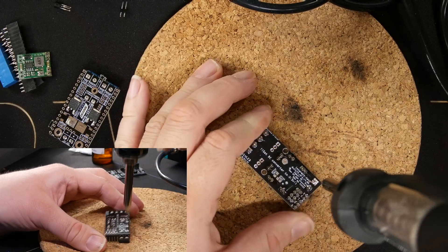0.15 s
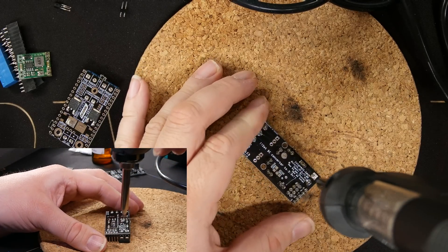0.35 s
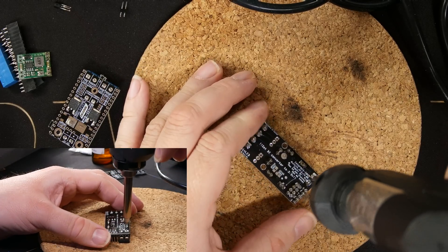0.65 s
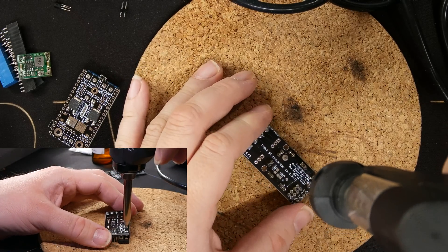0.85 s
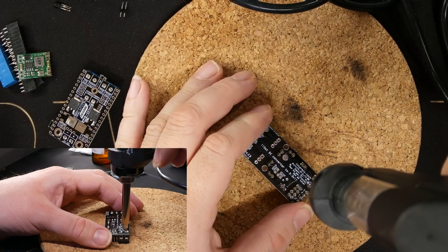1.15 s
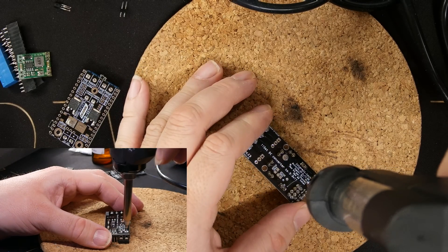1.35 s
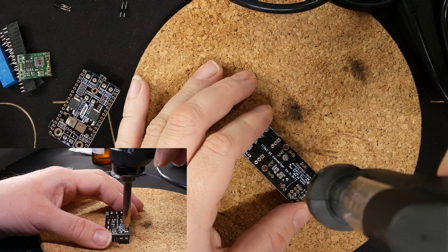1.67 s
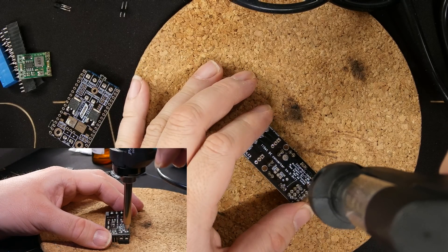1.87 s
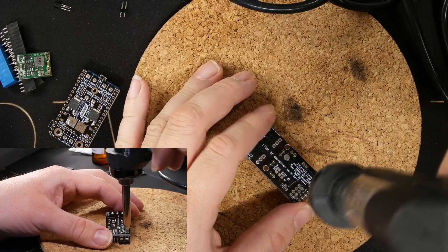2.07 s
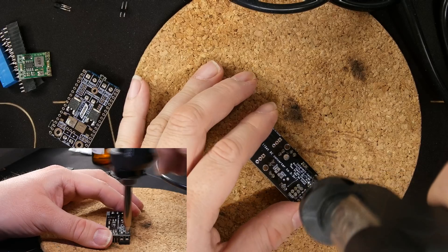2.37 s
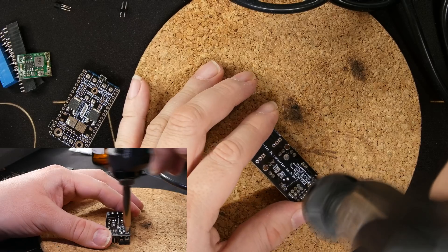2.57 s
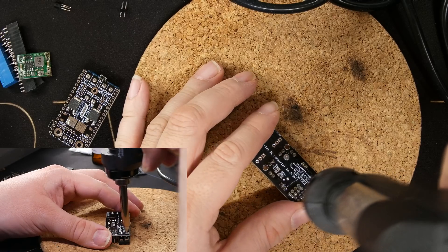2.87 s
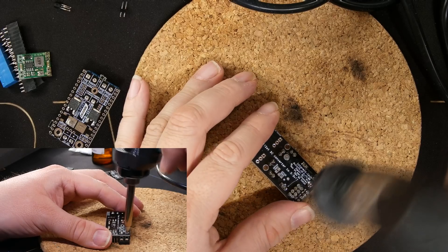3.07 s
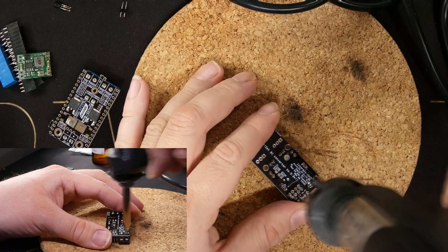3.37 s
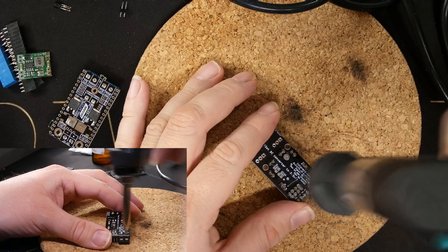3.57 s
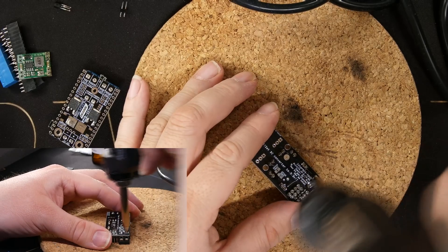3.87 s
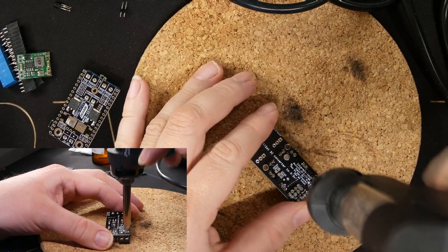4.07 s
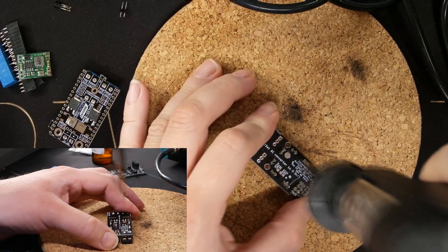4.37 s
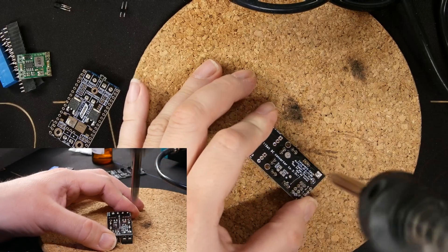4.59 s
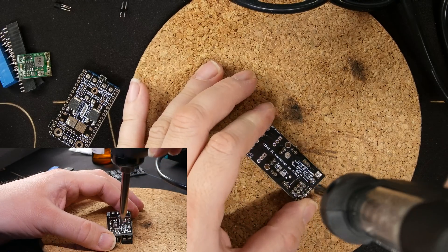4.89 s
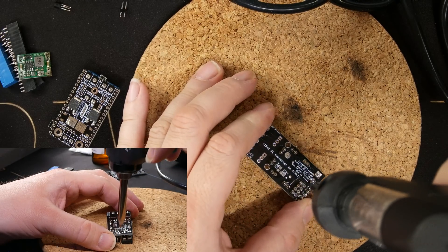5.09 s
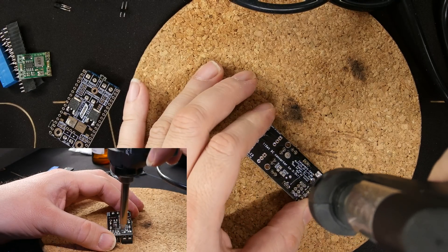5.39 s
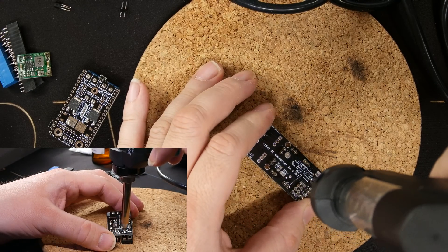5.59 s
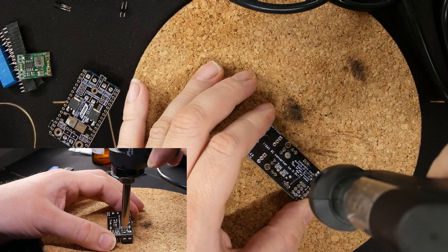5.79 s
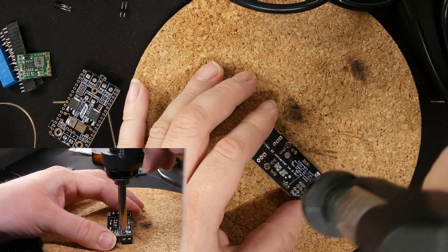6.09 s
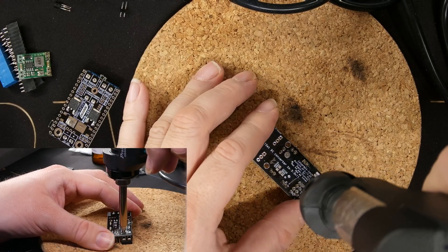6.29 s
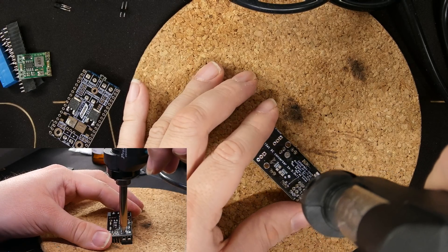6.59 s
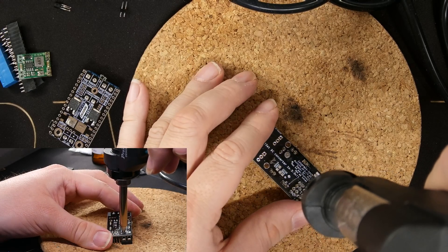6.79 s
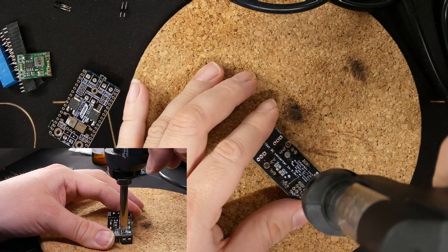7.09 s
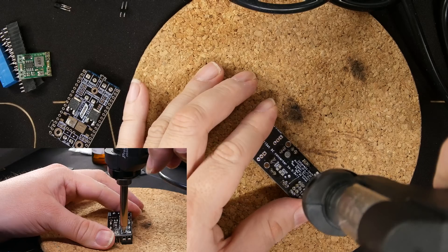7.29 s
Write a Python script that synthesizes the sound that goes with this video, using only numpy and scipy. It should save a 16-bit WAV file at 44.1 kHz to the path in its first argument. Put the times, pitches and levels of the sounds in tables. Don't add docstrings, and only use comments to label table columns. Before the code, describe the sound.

Very close on a workbench in a small quiet workshop: the end of an air rush, faint metal tip taps and thin electronic whine. Trigger clicks, then a small vacuum pump spins up into a rough low buzz for just over a second, its hiss choked by solder. It clunks to a stop, air rushes back with tiny squeaks, light taps and whine follow, and the pump starts again.

```python
import sys
import numpy as np
from scipy import signal
from scipy.fft import rfft, irfft, next_fast_len
from scipy.io import wavfile
from scipy.ndimage import uniform_filter1d

SR = 44100
rng = np.random.default_rng(int(sys.argv[2]) if len(sys.argv) > 2 else 0)


def gain_from_decibels(decibels):
    exponent = np.asarray(decibels, float) / 20
    return 10 ** exponent


def wav_record(signal):
    frames = np.transpose(np.atleast_2d(signal))
    bounded = np.clip(frames, -1, 1)
    quanta = np.round(bounded * 32767).astype(np.int16)
    wavfile.write(sys.argv[1], SR, quanta)


N = 328545
T = np.arange(N) / SR

# (time [s], one for each run)
STARTS_S = (2.665, 6.91)
STOP_S = 4.005
FULL_HZ = 107.5
# (time since start [s], speed [Hz])
SPIN_UP = [(0.0, 37.74), (0.03, 49.9), (0.062, 62.03), (0.125, 78), (0.178, 85.5), (0.24, 89.43),
           (0.33, 94), (0.368, 96.9), (0.459, 101.6)]
# (time [s], speed [Hz])
RUN_SPEED = [
    [(3.15, 103.2), (3.21, 103.9), (3.294, 104.3), (3.496, 107.3), (3.582, 107.2), (3.794, 105.7),
     (3.944, 107.2), (3.995, 107.1)],
    [(7.45, 104.4)],
]
# (time [s], closed share [0-1])
SEAL = [
    (3.06, 0.2),
    (3.11, 0.44),
    (4.0, 0.47),
    (4.03, 0.22),
    (7.18, 0.19),
    (7.3, 0.2),
    (7.35, 0.39),
]
# (level with nozzle open [dB], level with nozzle sealed [dB])
STROKE_PUSH = [
    (-35.5, -32),
    (-33.5, -36.5),
    (-38, -35),
    (-36, -35.5),
]
# (pitch [Hz], width [Hz], level [dB])
SHAKE_MODES = [(79.7, 2.3, 1), (99.9, 4.3, 5.5), (129.5, 12, 6.5), (177.5, 7, 1.5), (189.1, 9.6, 10.5),
               (201.3, 17.4, 6), (223.4, 9.2, 7), (265, 2.3, 2), (286.7, 34, -2), (321.5, 29.3, -0.5),
               (346, 4.9, -3), (362.6, 2, 7.5), (387, 12, 0.5)]
# (pitch [Hz], width [Hz], level [dB])
OPEN_CASE = [(320, 33, 10), (415, 77, -9), (525.4, 20, -2), (597, 21, -10.5), (735, 23, -9),
             (845, 15, -1.5), (915, 26, 2.5), (965, 95, 0), (1002, 78, 1), (1230, 76, -17.5),
             (1271, 28, -4.5), (1530, 230, -18), (1650, 22, -8.5), (1876, 16, -11), (1957, 39, -3.5),
             (2330, 440, -20.5), (2448, 53, -15.5), (2635, 29, -6.5), (3080, 57, -30), (3380, 86, -24),
             (4240, 97, -29.5), (474, 40, -10), (629, 28, -9.5), (693, 31, -10.5)]
# (pitch [Hz], width [Hz], level [dB])
SEALED_CASE = [(525, 24, -7), (623, 26, -2), (744, 24, -6), (855, 26, 3), (951, 24, 3), (1011, 16, 9),
               (1147, 45, -10), (1244, 24, -9), (1394, 74, -9), (1493, 34, -8), (1601, 18, -10),
               (1936, 15, 2), (2003, 15, -4), (2053, 19, -2), (2148, 22, -1), (2243, 27, -3),
               (2420, 29, -2), (2399, 93, -3), (2465, 30, 1), (2605, 63, -7), (2704, 15, -6),
               (2773, 27, -11), (3076, 50, -7), (3104, 171, -14), (3431, 25, -15), (3510, 43, -10),
               (4160, 40, -12), (4400, 120, -17), (1466, 18, -9), (1968, 16, -6), (2088, 16, -5),
               (2575, 20, -10)]
# (pitch [Hz], width [Hz], level [dB])
SEALED_SHELL = [(4640, 23, 9.5), (4930, 33, -1), (5330, 200, -1), (5950, 87, -17), (6150, 60, -9),
                (6650, 122, -5), (7050, 88, -1.5)]
# (pitch [Hz], width [Hz], share removed [0-1])
DEAD_SPOTS = [(1045, 20, .4), (1360, 30, .5), (1560, 30, .6), (1740, 190, .45), (2120, 14, .7),
              (2358, 26, .75), (2683, 22, .6), (5400, 400, .6)]

# (pitch [Hz], level per Hz [dB])
HISS_COLOUR = [(1760, -23), (3000, 4), (4810, -8.5), (5230, -8), (6720, -0.5), (7610, -7.5), (8390, -1.5),
               (15800, -22.5)]
# (pitch [Hz], width [Hz], level [dB])
NOZZLE_PIPE = [(4460, 97, -11), (4600, 60, -6), (4984, 52, -2), (5480, 38, -7.5), (5950, 100, -4),
               (6510, 64, -1), (6910, 110, -5.5), (8230, 85, -9), (8690, 30, -20), (9300, 75, -23),
               (9700, 100, -18), (10500, 85, -14), (11330, 30, -8.5), (11700, 36, -14), (12400, 89, -20),
               (13200, 200, -20), (13800, 98, -16), (14400, 60, -20), (15100, 57, -20), (15450, 190, -16)]
# (time [s], level [dB])
SIGH = [
    (4.09, -47),
    (4.094, -67),
    (4.176, -63),
    (4.3, -62),
]
# (time [s], level [dB], fading [dB per s],
# length [s])
AIR_RUSHES = [
    (-0.04, -56.5, 74, 0.22),
    (4.31, -52.5, 46, 0.33),
]
# (pitch [Hz], level per Hz [dB])
RUSH_COLOUR = [(290, -39), (500, -17), (687, -8), (749, -4.5), (1190, -5), (1420, -12), (2150, -3),
               (5190, -12), (6540, -10.5), (11200, -9), (15800, -15.5)]
# (pitch [Hz], width [Hz], level [dB])
LEAK = [(6500, 150, 6.5), (6600, 60, -3), (6850, 200, -1), (8800, 88, -1), (9500, 82, 2), (10900, 60, -7),
        (11300, 200, 0), (12300, 150, -7), (12800, 52, -9), (13300, 80, -7), (14200, 90, -4),
        (10300, 80, -4)]
# (time [s], peak level [dB], pitch [Hz])
SQUEAKS = [(4.4917, -40.5, 11400), (4.4964, -48, 11300), (4.5064, -44, 11300), (4.5114, -41, 12300),
           (4.5204, -45, 11300), (4.5284, -43, 11800), (4.5864, -59, 11900), (4.592, -46, 11800),
           (4.6054, -63, 11500), (4.6104, -55, 11800), (4.6304, -63, 11000), (4.6407, -49, 11300)]

# (time [s], peak level [dB], ring pitch [Hz], 60 dB decay [s], crack level [dB])
JOLTS = [(0.0, -37, 902, 0.067, -11), (0.03, -45.5, 977, 0.065, -15), (2.609, -34, 920, 0.015, -2),
         (2.664, -26.5, 902, 0.048, -35), (2.685, -30, 940, 0.053, -22), (4.02, -38.5, 2400, .15, -23),
         (4.045, -54, 5950, 0.089, -25), (4.056, -43, 930, 0.045, -11), (4.077, -31, 874, 0.049, -18),
         (4.102, -30, 1230, 0.021, -17), (4.038, -32, 2340, 0.068, -25), (4.044, -40, 1960, .04, -25),
         (4.064, -42, 2050, .03, -25), (3.998, -23, 2770, 0.023, -19), (4.15, -43, 943, .07, -17),
         (4.336, -38.5, 2810, 0.047, -7), (6.911, -20, 909, 0.056, -18), (6.933, -27.5, 943, 0.12, -26)]
# (time since start [s], peak level [dB], ring pitch [Hz], 60 dB decay [s], crack level [dB])
START_JOLTS = [
    (.05, -35, 795, 0.034, -17),
    (.062, -28.5, 1014, 0.044, -2.5),
    (0.082, -27, 980, 0.043, -16),
    (.108, -24.5, 984, 0.035, -10),
    (.155, -30, 960, 0.046, -16),
    (0.131, -28.5, 940, 0.064, -5.5),
    (0.178, -29, 966, 0.12, -20),
    (.196, -31.5, 1010, .07, -13),
    (.262, -33.5, 909, 0.17, -14),
    (.305, -34.5, 1883, 0.054, -1),
]
# (time [s], peak level [dB], brightness [dB],
# lever snap level [dB], spring ring level [dB])
TRIGGER = [(1.926, -53, 0, -6, -40), (2.3718, -34.5, -22, -10, -11), (2.4416, -36.5, -14, -8, -17),
           (2.601, -38.5, -2, 4.5, -35), (2.608, -27, -18, -8, -44), (2.6526, -21.5, -3, -2, -30),
           (3.9974, -20, -0.5, -5, -28), (4.336, -35, -8, -15, -22), (6.8334, -48, -28, -24, -28),
           (6.8757, -45, -26, -24, -28), (6.886, -48, -18, -3, -30), (6.8962, -23, -2.5, -0.5, -28),
           (6.9183, -36, -4, -18, -21)]
# (pitch [Hz], width [Hz], level [dB])
TRIGGER_MODES = [(1910, 114, 1.5), (2850, 110, -7), (3776, 200, 0), (5950, 650, -3), (7000, 500, 11),
                 (8900, 1150, 0), (11000, 970, 1.5), (14200, 1700, -5)]
# (time [s], peak level [dB], ring pitch [Hz], 60 dB decay [s], crack level [dB])
TAPS = [(0.151, -53.5, 1240, 0.02, 4), (0.579, -54, 1220, .02, -8), (0.583, -53.5, 2060, 0.036, -1),
        (0.589, -53, 2860, .03, -6), (0.596, -59, 3700, .03, -9), (0.832, -57, 1290, .015, -5),
        (0.862, -51, 1500, 0.013, 0), (0.868, -44.5, 620, 0.014, -11), (0.876, -54, 970, 0.024, -8),
        (0.912, -51, 650, 0.018, -10), (0.983, -56, 850, 0.03, -16), (0.99, -56, 940, .04, -9),
        (0.998, -59, 1130, 0.024, -4), (1.161, -52, 1410, 0.025, 1), (1.221, -60, 1500, .015, 3),
        (1.38, -63, 1390, .02, 5), (1.47, -42, 3080, 0.019, -1.5), (1.479, -62, 4030, 0.018, 0),
        (1.524, -51.5, 1320, 0.032, 0), (1.544, -61, 1390, .03, 0), (1.752, -53, 1390, 0.02, -6),
        (1.766, -56, 1455, .06, -10), (1.916, -45.5, 1300, 0.037, -4), (1.92, -49.5, 1810, .03, -2),
        (1.926, -41, 950, 0.026, -7), (1.932, -56, 2620, 0.034, -5), (1.966, -52.5, 2190, 0.025, -10),
        (4.312, -26.5, 1270, 0.013, -12), (4.313, -32.5, 1650, 0.028, -20), (4.585, -50.5, 3150, 0.028, -4),
        (5.426, -52, 1270, 0.026, 5.5), (5.437, -62, 1400, .04, -2), (5.654, -53, 1400, 0.02, 0),
        (5.665, -60, 1900, .02, 6), (5.691, -55.5, 1430, 0.025, -2), (5.858, -59, 1500, 0.02, 0),
        (6.35, -62, 1440, 0.055, 0), (2.6095, -41, 2920, 0.032, -10)]
# (time [s], peak level [dB], 60 dB decay [s])
BENCH_PUSHES = [(0.0, -39.5, 0.61), (0.25, -60, 0.23), (0.95, -67, 0.88), (1.58, -59, 0.4),
                (1.82, -62, 0.29), (1.95, -46, 0.7), (2.57, -55.5, 1.2), (2.655, -54, .15),
                (2.82, -47, 0.39), (3.34, -44, 0.17), (3.55, -49, 0.2), (3.86, -34, 0.42),
                (4.15, -45.5, 0.18), (4.36, -45.5, 0.82), (4.98, -61, 0.22), (5.46, -59, 0.29),
                (5.66, -57, 3.1), (6.12, -88, .4), (6.41, -64, 0.19), (6.97, -55, .6), (7.07, -47, 0.4),
                (7.45, -54, 0.32)]
# (time [s], peak level [dB], 60 dB decay [s])
MAT_KNOCKS = [(0.0, -42, 0.24), (0.184, -59, 0.77), (1.472, -52, 0.038), (1.532, -60, 0.19),
              (1.782, -55.5, 0.083), (1.932, -45, 0.13), (4.04, -36, 0.52), (4.312, -40, 0.28),
              (4.548, -57, 0.2), (4.668, -61, 0.21), (5.438, -56, 0.22), (5.662, -59, 0.48),
              (5.934, -62, 0.42)]
# (pitch [Hz], level [dB], 60 dB decay [s])
STAND = [
    (2290, -65.5, 1.23),
    (1890, -69, 0.89),
    (900, -47, 0.074),
    (178.5, -41, 0.28),
]
# (multiple of the switching rate, light load [dB], medium load [dB], heavy load [dB])
WHINE = [(8, -110, -90, -110), (9, -83, -79.5, -86), (10, -110, -90, -110), (13, -110, -110, -90),
         (14, -104, -110, -95), (15, -87, -92, -92), (18, -110, -110, -96), (19, -92, -88, -88.5),
         (20, -86, -110, -110), (21, -102, -110, -93), (24, -98, -110, -110), (26, -94, -110, -89),
         (27, -89, -105, -92), (28, -90, -88, -110), (29, -103, -93, -110), (31, -110, -110, -91),
         (32, -99, -97, -110), (33, -95, -98, -100), (37, -104, -110, -94)]
# (on [s], off [s], load [0-2], level [dB], extra level of lowest lines [dB])
HEATER_ON = [(.21, .6, 0, -1, 2), (.6, .92, 0, 0, -20), (1.13, 1.92, 0, 0, 0), (2.35, 2.6, 0, -3, -6),
             (4.84, 5.01, 1, -2, 3), (5.04, 5.13, 1, -2, 3), (5.13, 5.27, 1, 1, -18), (5.27, 5.6, 1, 0, -2),
             (5.67, 5.74, 1, 0, -12), (5.85, 6.05, 1, -3, -3), (6.05, 6.72, 2, 0, -2)]
# (pitch [Hz], level per Hz [dB])
ROOM_COLOUR = [(12, -49), (20, 2.5), (65, -15.5), (81, -9), (216, -8.5), (347, -10), (459, -11.5),
               (499, -14.5), (897, -18.5), (1000, -20.5), (2600, -29.5), (3160, -28), (3840, -31),
               (6720, -31.5), (16000, -33.5)]


def pump():
    hz, since, coasting, turning = motor()
    shut = np.clip(2 * seal(), 0, 1)
    turns = np.cumsum(hz) / SR
    turns = turns - 0.46 * (T < STOP_S + 1)
    shake = shaking(hz, since, coasting, turning, shut, turns)

    rough_open, rough_sealed, rough_coast = 0.3, 0.018, 0.5
    rough = rough_open + (rough_sealed - rough_open) * shut
    rough = np.clip(np.where(coasting > 0, rough_coast, rough), 0, 1)
    angle = np.pi * (turns % 1 + 1e-9)
    slaps = (np.sin(141 * angle) - np.sin(9 * angle)) / np.sin(angle)
    stroke_db = 1.5 * rng.standard_normal(N // 200)[(turns + 0.5).astype(int)]
    slaps = slaps * gain_from_decibels(stroke_db * (0.1 + 2.5 * rough))
    puff_shape = 0.25 + np.exp(-(2 * turns % 1) / 0.35)
    puffs = band(rng.standard_normal(N) * puff_shape, 750, 9000)
    drive = np.sqrt(1 - rough) * level(slaps) + np.sqrt(rough) * level(puffs)

    opened = level(ring(drive, OPEN_CASE, drift_db=1.0, rate=12))
    sealed = sealed_case(drive)
    tight = np.clip((seal() - 0.12) / 0.3, 0.15, 1)
    buzz_hz, buzz_width_hz, buzz_db = 85.5, 2.3, 4.5
    buzz = buzz_db / (1 + ((hz - buzz_hz) / buzz_width_hz) ** 2)
    open_db, sealed_db, coast_db_per_s, speed_power, rise_s = -38, 0.7, 118, 0.79, 0.031
    loud = gain_from_decibels(open_db + sealed_db * shut + buzz - coast_db_per_s * coasting)
    loud = loud * turning * (hz / FULL_HZ) ** speed_power * (1 - np.exp(-since / rise_s))
    loose = (coasting > 0) * gain_from_decibels(-11) * level(band(puffs, 683, 3600))
    clatter = loud * (np.sqrt(1 - tight) * opened + loose)
    return shake + loud * np.sqrt(tight) * sealed, clatter, turns


def shaking(hz, since, coasting, turning, shut, turns):
    speed_power, rise_s, coast_db_per_s = 2.23, 0.015, 89
    top_hz, top_db = 345.7, -12.5
    force = turning * (hz / FULL_HZ) ** speed_power * (1 - np.exp(-since / rise_s))
    out = 0
    for k, (open_db, sealed_db) in enumerate(STROKE_PUSH, 1):
        lift = sum(gain_from_decibels(db) / (1 + 2j * (k * hz[::32] - mode_hz) / width) for mode_hz, width, db in SHAKE_MODES)
        lift = np.interp(T, T[::32], lift)
        lift = lift * gain_from_decibels(top_db / (1 + np.exp((top_hz - k * hz) / 2)))
        lift = lift * gain_from_decibels(-k * coast_db_per_s * coasting)
        push = np.sqrt(2) * force * gain_from_decibels(open_db + (sealed_db - open_db) * shut)
        out = out + push * np.real(1j * lift * np.exp(2j * np.pi * k * turns))
    return out


def sealed_case(drive):
    out = level(ring(band(drive, 456, 3400, order=3), SEALED_CASE, drift_db=0.5))
    out = out + level(ring(drive, SEALED_SHELL, drift_db=4.0, rate=5), -33.5)
    for hz, width, share in DEAD_SPOTS:
        out = out - share * ring(out, [(hz, width, 0)])
    return out


def motor():
    coast_hz_per_s, coast_s = 322, 0.17
    last_hz = RUN_SPEED[0][-1][1]
    stop = [(STOP_S, last_hz), (STOP_S + coast_s, last_hz - coast_hz_per_s * coast_s)]
    ups = [[(start + s, hz) for s, hz in SPIN_UP] for start in STARTS_S]
    points = ups[0] + list(RUN_SPEED[0]) + stop + ups[1] + list(RUN_SPEED[1])
    hz = np.interp(T, *np.transpose(points))
    second = T > STARTS_S[1]
    coasting = np.where(second, 0, np.maximum(T - STOP_S, 0))
    since = np.maximum(T - np.where(second, STARTS_S[1], STARTS_S[0]), 0)
    turning = uniform_filter1d(1.0 * ((since > 0) & (coasting < coast_s)), size=300)
    return hz, since, coasting, turning


def seal():
    return np.clip(np.interp(T, *np.transpose(SEAL)), 0, 1)


def nozzle_air(turns):
    hz = motor()[0]
    throb = 1 + 0.33 * np.cos(2 * np.pi * turns) * (1.6 - hz / FULL_HZ)
    pipe = level(ring(rng.standard_normal(N), NOZZLE_PIPE, drift_db=1.5, rate=9))
    best_hz, best_width_hz, best_db = 90.7, 4.3, 10
    whistle = (1 - 1.3 * seal()) * (hz / FULL_HZ) ** 2.4 * pipe
    whistle = whistle * gain_from_decibels(best_db / (1 + ((hz - best_hz) / best_width_hz) ** 2))
    flutter = gain_from_decibels(0.5 * walk(25))
    return flow() * level(throb * flutter * (noise(HISS_COLOUR) + whistle), 0.85)


def flow():
    hz, since, coasting, turning = motor()
    air_db, sealed_db, speed_power = -47, -17.5, 0.18
    vent_db, vent_t60_s = -52, 0.59
    drawn = turning * (hz / FULL_HZ) ** speed_power * gain_from_decibels(air_db + sealed_db * np.clip(2 * seal(), 0, 1))
    vent = gain_from_decibels(vent_db) * np.exp(-np.log(1000) * coasting / vent_t60_s)
    return uniform_filter1d(np.where(coasting > 0, vent, drawn), size=200)


def vacuum_sigh():
    white = rng.standard_normal(N)
    breath = band(white, 3000, 3600) + 0.74 * band(white, 3700, 4200) + 0.07 * band(white, 5900, 13000)
    breath = breath + 0.84 * band(white, 1220, 1330) + 0.48 * band(white, 1660, 2500)
    return gain(SIGH) * level(breath)


def air_rush():
    rise_s, end_s = 0.0071, 0.029
    loud = 0
    for s, db, fade_db, length in AIR_RUSHES:
        t = np.maximum(T - s, 0)
        ending = np.exp(-np.maximum(t - length, 0) / end_s)
        loud = loud + gain_from_decibels(db - fade_db * t) * (1 - np.exp(-t / rise_s)) * ending
    leak = level(ring(rng.standard_normal(N), LEAK, drift_db=3.0, rate=14))
    return loud * gain_from_decibels(0.94 * walk(40)) * (noise(RUSH_COLOUR) + 0.63 * leak)


def leak_squeaks():
    white, out = rng.standard_normal(N), np.zeros(N)
    spit = level(band(white, 4800, 11000))
    for s, db, hz in SQUEAKS:
        add(out, s, 0.025, db - 7, level(band(white, 0.92 * hz, 1.05 * hz)), rise_s=0.001)
        add(out, s, 0.012, db - 7, spit)
    return out


def trigger():
    white, out = rng.standard_normal(N), np.zeros(N)
    kick_at = ((np.array(TRIGGER)[:, 0] + 0.0007) * SR).astype(int)
    snap = white + 5 * np.bincount(kick_at, minlength=N)
    body = level(ring(snap, TRIGGER_MODES[:2]))
    lever = level(ring(snap, TRIGGER_MODES[2:3]))
    high = level(ring(snap, TRIGGER_MODES[3:]))
    spring_hz, spring_t60_s = 3670, 0.11
    spring = np.sin(2 * np.pi * spring_hz * T) * gain_from_decibels(4.0 * walk(120))
    for s, db, bright_db, lever_db, spring_db in TRIGGER:
        click = 0.5 * body + gain_from_decibels(lever_db + 1) * lever + gain_from_decibels(bright_db + 3.5) * high
        add(out, s, 0.016, db - 6, click, rise_s=0.00089)
        add(out, s, spring_t60_s, db + spring_db - 12, spring)
        add(out, s, 0.14, db - 26, body + gain_from_decibels(bright_db) * high)
    return out


def jolts_and_taps():
    white, out = rng.standard_normal(N), np.zeros(N)
    add(out, 4.312, 0.036, -40, level(band(white, 220, 1140)), rise_s=0.00047)
    jolts = list(JOLTS) + [(start + s, *rest) for start in STARTS_S for s, *rest in START_JOLTS]
    tap_rise_s, jolt_rise_s = 0.00046, 0.0024
    hits = [(*row, tap_rise_s) for row in TAPS] + [(*row, jolt_rise_s) for row in jolts]
    crack = level(band(white, 290, 2500, order=3))
    for s, db, hz, t60, crack_db, rise_s in hits:
        tone = np.sin(2 * np.pi * hz * (T - s)) + 0.54 * np.sin(2 * np.pi * 1.09 * hz * (T - s))
        add(out, s, t60, db - 5, tone, rise_s=rise_s)
        add(out, s, 0.81 * t60, db + crack_db - 8, crack, rise_s=0.00037)
        add(out, s, 2.1 * t60, db + crack_db - 25, crack)
    return out


def bench():
    out = bumps(BENCH_PUSHES, 183) * level(band(rng.standard_normal(N), 9, 53))
    mat_modes = [(91.2, 11.0, 4.0), (205, 14.3, -9.5), (329, 82, -13.5)]  # (Hz, width Hz, dB)
    out += bumps(MAT_KNOCKS, 1500) * level(ring(rng.standard_normal(N), mat_modes))
    for hz, db, t60 in STAND:
        add(out, 0, t60, db, np.sin(2 * np.pi * hz * T))
    hz, db, t60 = STAND[1]
    add(out, STOP_S, t60, db + 11, np.sin(2 * np.pi * hz * T))
    return out


def heater():
    switch_hz = 343.13
    lines = [np.sqrt(2) * np.sin(2 * np.pi * (k * switch_hz * T + rng.random())) for k, *_ in WHINE]
    lines, table = np.array(lines), np.array(WHINE)
    lowest = table[:, 0] <= 10
    out = 0
    for on, off, load, db, low_db in HEATER_ON:
        whine = gain_from_decibels(table[:, 1 + load] + low_db * lowest) @ lines
        out = out + gain_from_decibels(db) * uniform_filter1d(1.0 * ((T > on) & (T < off)), size=300) * whine
    return out


def room_echo(near):
    tail = np.zeros(SR // 2)
    add(tail, 0.004, 0.2, 0, band(rng.standard_normal(N), 170, 4300, order=1))
    return gain_from_decibels(-13) * signal.fftconvolve(near, tail / np.sqrt(np.sum(tail ** 2)))[:N]


def quiet_workshop():
    return gain_from_decibels(-66 + 1.1 * walk(2.71)) * noise(ROOM_COLOUR)


def level(x, db=0):
    return x * gain_from_decibels(db) / np.sqrt(np.mean(x ** 2))


def band(x, lo_hz, hi_hz, order=2):
    sos = signal.butter(order, [lo_hz, min(hi_hz, 0.48 * SR)], "band", fs=SR, output="sos")
    return signal.sosfilt(sos, x)


def ring(x, modes, drift_db=0, rate=4):
    swell = gain_from_decibels(walk(rate) * drift_db) if drift_db else np.ones(1)
    out = 0
    for k, (hz, width, db) in enumerate(modes):
        mode = signal.lfilter(*signal.iirpeak(hz, hz / width, SR), x)
        out = out + (-1) ** k * gain_from_decibels(db) * np.roll(swell, 37000 * k) * mode
    return out


def noise(points):
    hz, db = np.transpose(points)
    size = next_fast_len(N)
    log_hz = np.log(np.arange(size // 2 + 1) * SR / size + 1)
    spectrum = rfft(rng.standard_normal(size)) * gain_from_decibels(np.interp(log_hz, np.log(hz), db))
    return level(irfft(spectrum, size)[:N])


def gain(table, edge_s=0.0033):
    rows = [(table[0][0] - edge_s, -120), *table, (table[-1][0] + 4 * edge_s, -120)]
    return gain_from_decibels(np.interp(T, *np.transpose(rows)))


def walk(rate):
    k = int(SR / rate)
    steps = np.repeat(rng.standard_normal(N // k + 1), k)
    return 1.3 * uniform_filter1d(uniform_filter1d(steps, k), k)[:N]


def add(out, start_s, t60_s, db, sound, rise_s=0.00084):
    i = int(max(start_s, 0) * SR)
    t60_s = max(t60_s, 0.004)
    t = T[:min(N - i, int(1.3 * SR * t60_s))]
    shape = (1 - np.exp(-t / rise_s)) * np.exp(-np.log(1000) * t / t60_s)
    out[i:i + len(t)] += gain_from_decibels(db) * shape * sound[i:i + len(t)]


def bumps(rows, rise_db_per_s):
    t = T[::16]
    total = sum(gain_from_decibels(db + np.minimum((t - s) * rise_db_per_s, (s - t) * 60 / t60)) for s, db, t60 in rows)
    return np.interp(T, t, total)


def scene():
    shake, clatter, turns = pump()
    air = nozzle_air(turns) + vacuum_sigh() + air_rush() + leak_squeaks()
    near = clatter + air + trigger() + jolts_and_taps()
    return (shake + near + room_echo(near) + bench() + heater() + quiet_workshop())[None]


def low_pass(x):
    return signal.sosfilt(signal.butter(12, 16590, fs=SR, output="sos"), x)


def record(dry):
    cut = signal.sosfilt(signal.ellip(12, 0.2, 45, 15730, fs=SR, output="sos"), dry)
    return low_pass(cut)


dry = scene()
out = record(dry)
wav_record(out)
```